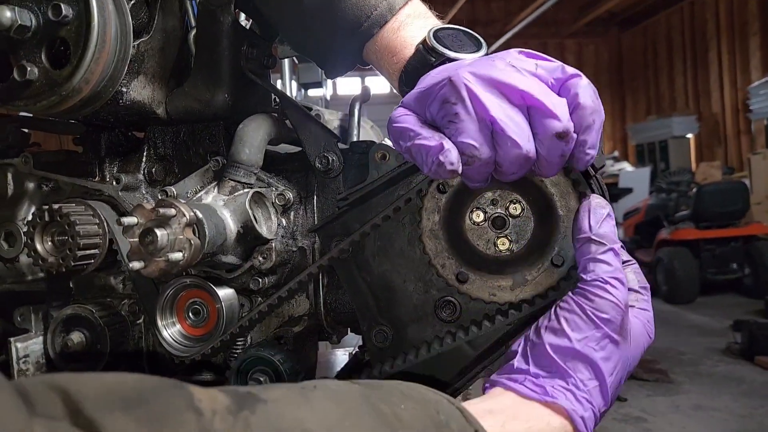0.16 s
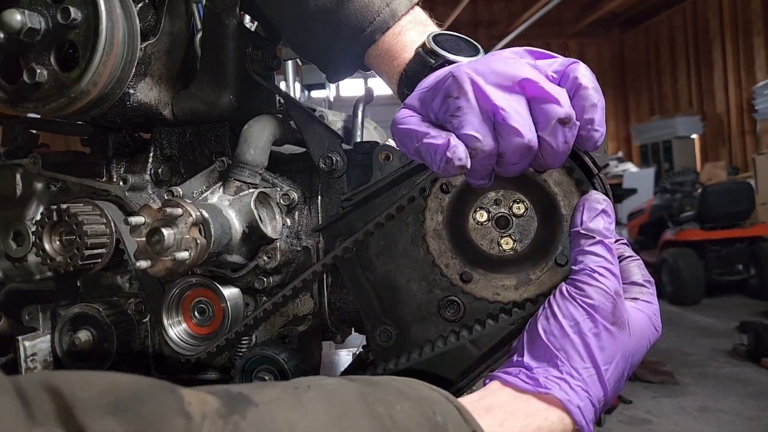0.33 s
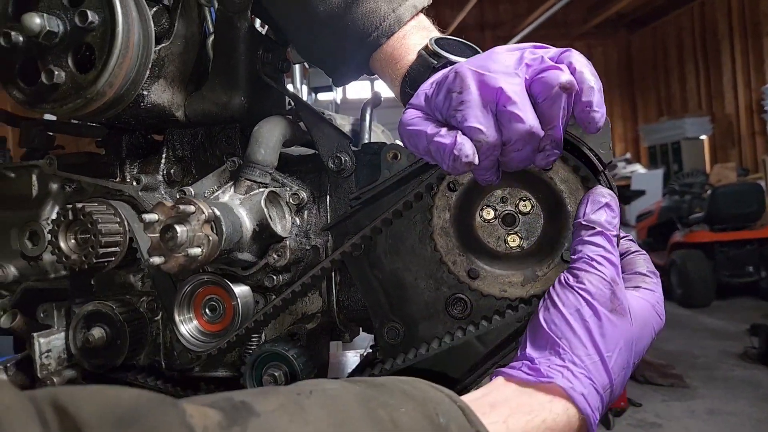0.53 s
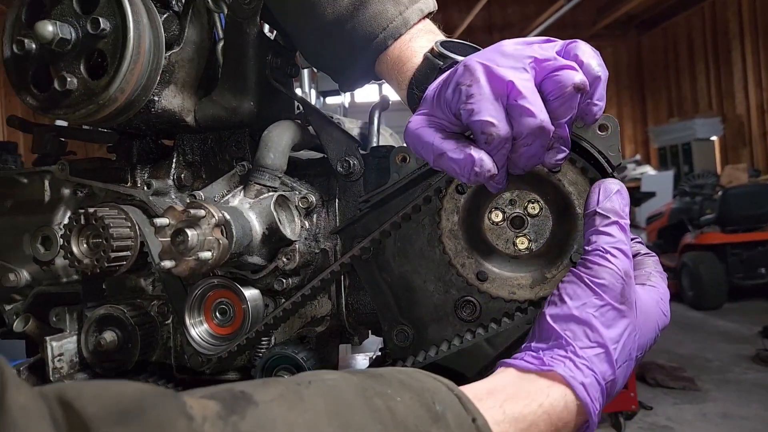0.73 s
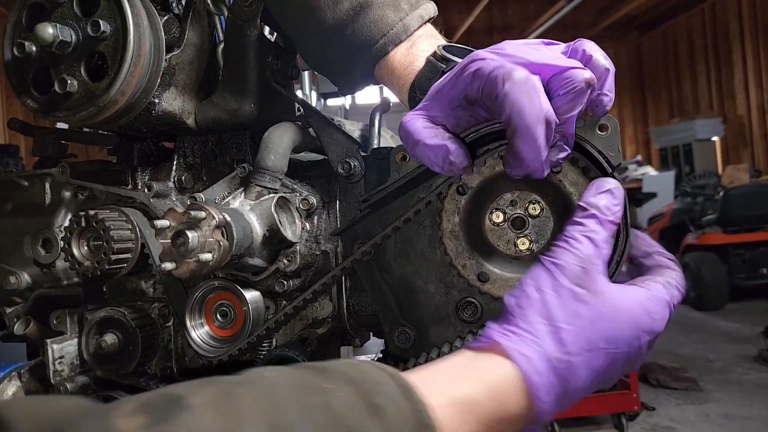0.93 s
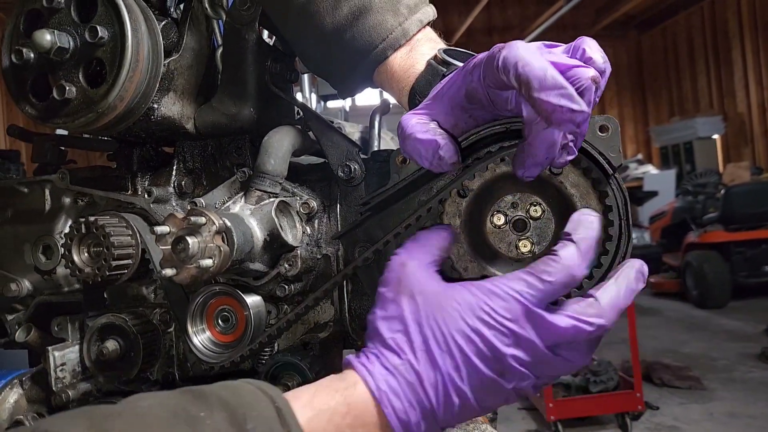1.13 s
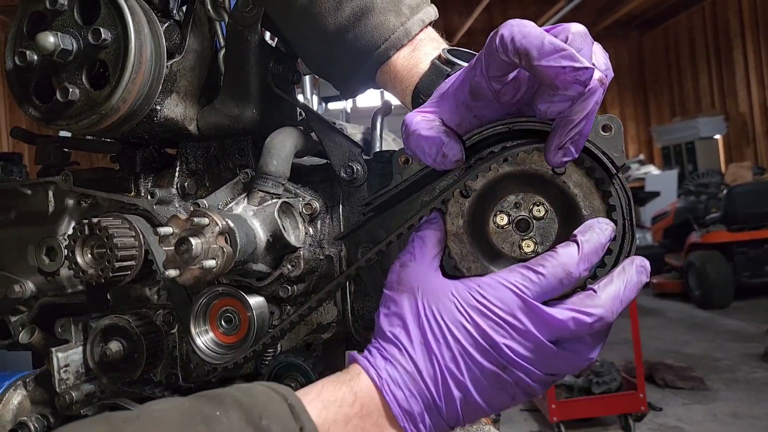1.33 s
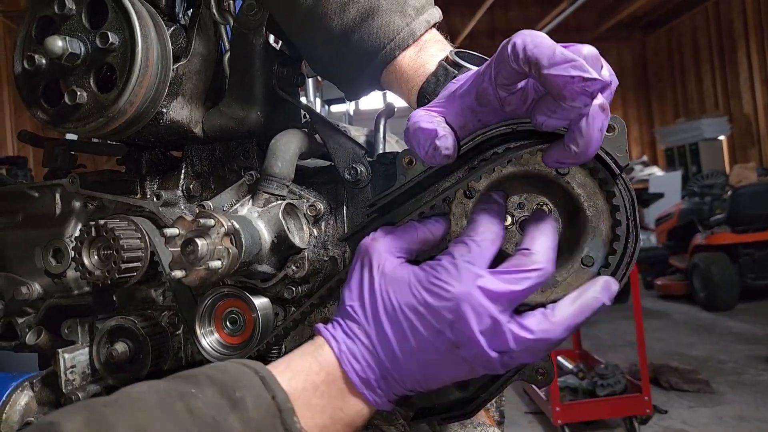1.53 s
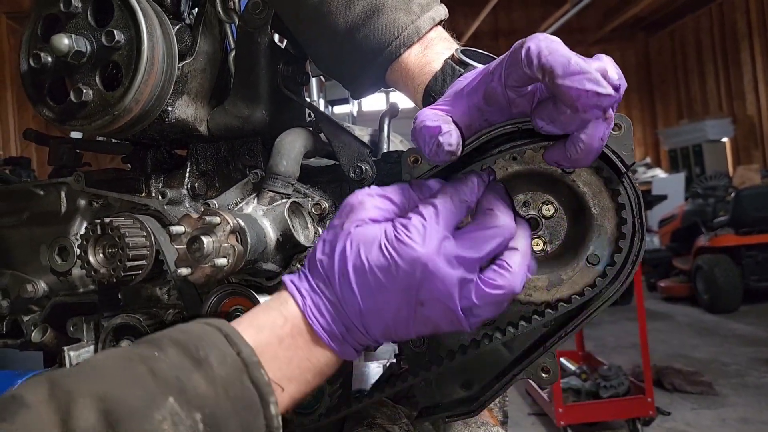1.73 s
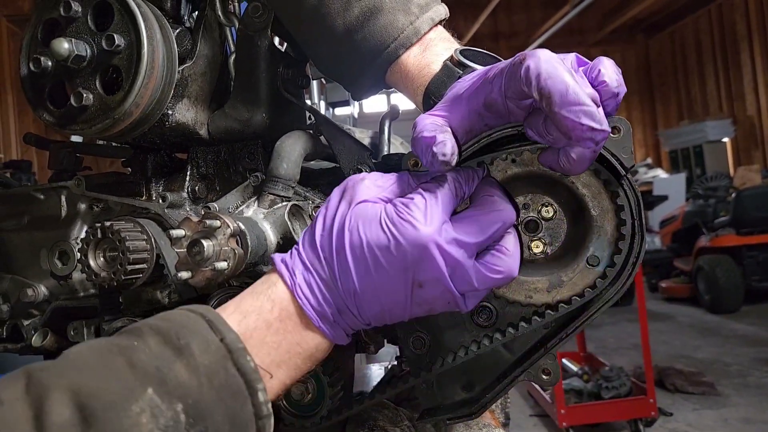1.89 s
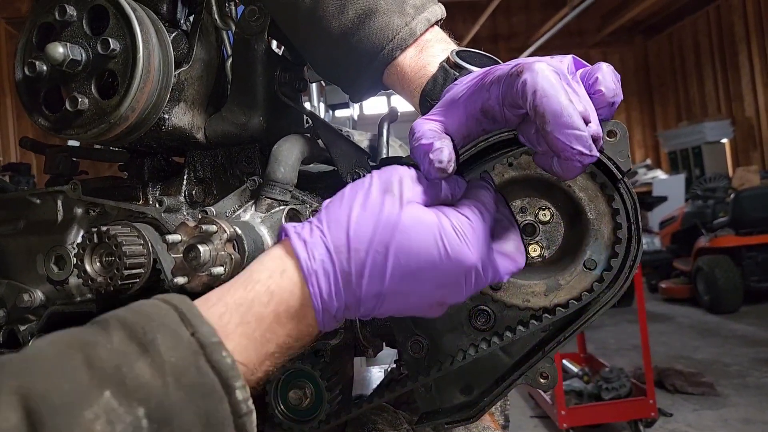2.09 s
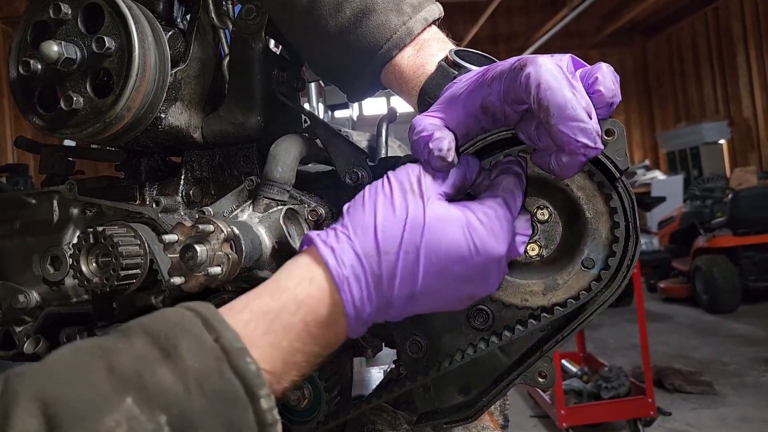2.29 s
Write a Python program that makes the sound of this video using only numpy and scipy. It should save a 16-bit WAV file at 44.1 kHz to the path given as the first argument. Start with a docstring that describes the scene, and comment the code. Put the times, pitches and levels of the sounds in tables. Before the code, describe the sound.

Short glove scuffs and a belt creak lead to a loud low thud, fluttering briefly; faint squeaks, sleeve rustle, soft finger bumps and small sharp clicks follow, heard close in a quiet garage.

```python
"""Gloves rub and crinkle in short strokes in a garage's still air, handling an engine's rubber timing belt.
The belt drags with a faint creak, slips onto its metal pulley with a deep knock and flutters on.
Clicks, thin squeaks, sleeve rustle, finger bumps and a low murmur follow. Friction is shaped noise,
knocks and bumps are decaying modes, flutter and squeaks are gliding sines; a noise tail adds the room."""
import sys
import numpy as np
from scipy import signal
from scipy.fft import rfft, irfft, next_fast_len
from scipy.io import wavfile
from scipy.ndimage import uniform_filter1d

SR = 44100
rng = np.random.default_rng(int(sys.argv[2]) if len(sys.argv) > 2 else 0)


def digitize_waveform(pressure):
    """Quantize a signal to 16-bit integers and store it at the path in sys.argv[1].

    Rows of a 2-D input are taken as channels; values are limited to [-1, 1].
    """
    field = np.atleast_2d(pressure).T
    bounded = np.clip(field, -1, 1)
    quanta = np.round(bounded * 32767).astype(np.int16)
    wavfile.write(sys.argv[1], SR, quanta)


N = 103635


def amp(db):
    """Decibels to gain."""
    return 10 ** (np.asarray(db) / 20)


def unit(x):
    """Scale to rms 1."""
    return x / np.sqrt(np.mean(x ** 2) + 1e-20)


def along(points, hz):
    """Interpolate (frequency [Hz], value) points on a log-frequency axis."""
    point_hz, value = np.transpose(points)
    return np.interp(np.log(hz + 1), np.log(point_hz + 1), value)


def clock():
    """Time of each sample [s]."""
    return np.arange(N) / SR


def filtered(x, response):
    """Multiply the spectrum of x by response(hz)."""
    m = next_fast_len(N + SR)
    return irfft(rfft(x, m) * response(np.fft.rfftfreq(m, 1 / SR)), m)[..., :N]


def colour(x, points):
    """Filter x by a (frequency [Hz], gain [dB]) curve."""
    return filtered(x, lambda hz: amp(along(points, hz)))


def narrow(x, hz, width_hz):
    """A steep band of x at rms 1: two cascaded peak filters, each 2 * width_hz wide."""
    peak = signal.iirpeak(hz, hz / (2 * width_hz), SR)
    return unit(signal.lfilter(*peak, signal.lfilter(*peak, x)))


def swell(s, rise_s, fall_s):
    """Bell-shaped stroke peaking at s; 1/e at rise_s before and fall_s after."""
    t = clock() - s
    return np.exp(-(t / np.where(t < 0, rise_s, fall_s)) ** 2)


def blow(s, rise_s, t60_s):
    """Quick exponential rise, then exponential decay."""
    t = np.maximum(clock() - s, 0)
    return (1 - np.exp(-t / rise_s)) * np.exp(-np.log(1000) * t / t60_s)


def spread(pair, alike):
    """Mix two unrelated signals to left and right with a correlation set per frequency."""
    def mid_side_gains(hz):
        turn = np.arccos(np.clip(along(alike, hz), -1, 1)) / 2
        return np.array([np.cos(turn), np.sin(turn)])

    mid, side = filtered(pair, mid_side_gains)
    return np.array([mid + side, mid - side])


def noise(points, alike):
    """Coloured stereo noise of rms 1."""
    return unit(colour(spread(rng.standard_normal((2, N)), alike), points))


# left-right likeness of room sound: (frequency [Hz], correlation)
ROOM_LIKENESS = [(60, 0.93), (250, 0.99), (600, 0.23), (1600, .25), (5000, 0.017)]
# air spectrum: (frequency [Hz], gain [dB])
AIR_COLOUR = [(20, -18), (60, 1.5), (130, -7), (270, -6), (450, -19), (800, -18.5), (4500, -13.5),
              (7000, -18), (15500, -24.5)]
AIR_DB = -65


def still_air():
    """Steady background noise of the garage air."""
    return amp(AIR_DB) * noise(AIR_COLOUR, ROOM_LIKENESS)


# left-right likeness of near sounds: (frequency [Hz], correlation)
NEAR_LIKENESS = [(60, 1), (250, 0.6), (600, 0.69), (1500, 0.048), (5000, 0.16), (15000, .1)]
SLIP_SCATTER_DB, SMOOTH_POWER_SHARE = 2, 0.4


def slips(rate_per_s):
    """Stick-slip friction: random jerks of uneven size mixed with smooth hiss."""
    size = amp(SLIP_SCATTER_DB * rng.standard_normal(N).clip(-2, 2))
    sign = rng.choice([-1, 1], (2, N))
    jerks = (rng.random(N) < rate_per_s / SR) * size * sign
    hiss = rng.standard_normal((2, N))
    mix = np.sqrt(1 - SMOOTH_POWER_SHARE) * unit(jerks) + np.sqrt(SMOOTH_POWER_SHARE) * hiss
    return spread(mix, NEAR_LIKENESS)


# glove contact spectrum: (frequency [Hz], gain [dB])
GLOVE_COLOUR = [(950, -13), (1300, 0.5), (2300, -10), (3200, 5), (3900, -1), (4700, 3.5), (5700, -10),
                (8000, -21), (15000, -37.5)]
# resonances of the rubbed pulley: (frequency [Hz], width [Hz], gain [dB])
PULLEY_MODES = [(1400, 120, -5), (1803, 190, 3), (2335, 210, 1.5), (3130, 16, 1), (3850, 250, -12),
                (4630, 120, 7.5)]
PULLEY_DB = -1  # relative to the glove colour
GLOVE_LOW_HZ = 1180  # the rubbed pulley radiates little below this


def pulley(x):
    """Contact sound: the glove's broad colour plus the pulley's resonances, low end cut, at rms 1."""
    def ring(f):
        total = 0
        for k, (hz, width_hz, db) in enumerate(PULLEY_MODES):
            resonance = 1j * f * width_hz / (hz * hz - f * f + 1j * f * width_hz)
            total = total + (-1) ** k * amp(db) * resonance
        return total

    both = unit(colour(x, GLOVE_COLOUR)) + amp(PULLEY_DB) * unit(filtered(x, ring))
    return unit(filtered(both, lambda hz: 1 / np.sqrt(1 + (GLOVE_LOW_HZ / (hz + 1)) ** 10)))


# glove strokes: (peak time [s], rise [s], fall [s], level [dB], fizz re level [dB], left minus right [dB])
GLOVE_STROKES = [(0.005, 0.034, 0.19, -61, -8.5, 6), (0.0892, 0.007, 0.0065, -43.5, -6, 4.5),
                 (0.110, 0.016, 0.0067, -50.5, -10.5, -7), (0.13, .008, 0.042, -59.5, -7, -0.5),
                 (0.205, 0.026, 0.048, -53, -4.5, 3), (0.328, 0.012, 0.018, -59, -1.5, 5),
                 (0.436, 0.031, 0.018, -59, -12.5, 1), (0.822, 0.016, 0.017, -55, -0.5, -1),
                 (0.891, 0.045, 0.034, -54, -1.5, 0.5), (1.112, 0.035, 0.037, -58, -4.5, 3),
                 (1.159, 0.016, 0.047, -65, 3.5, 0.5), (1.22, .013, 0.0076, -48, 0.5, 1.5),
                 (1.25, 0.02, 0.014, -51.5, -6.5, -2.5), (1.37, 0.028, 0.021, -59.5, -7.5, 7),
                 (1.431, 0.021, 0.027, -59, -10, 7), (1.464, 0.0074, 0.018, -52, -5.5, 2),
                 (1.548, .025, 0.019, -54, -2, -1), (1.583, 0.0097, 0.012, -53, -1.5, -3.5),
                 (1.66, 0.2, 0.02, -61, -5, 5.5), (1.804, 0.0072, 0.0084, -61, -2.5, 4),
                 (1.936, 0.014, 0.026, -55.5, -7.5, -3.5), (2.044, 0.0224, .02, -49, -8, -0.5),
                 (2.1149, 0.0036, 0.0059, -45, 3.5, 0.5), (2.135, 0.017, 0.0073, -61.5, -8.5, -11.5),
                 (2.207, 0.0096, 0.0098, -39.5, -7, 1)]
# crinkle spectrum: (frequency [Hz], gain [dB])
FIZZ_COLOUR = [(2000, -38), (5000, -4.5), (7500, -1), (10000, -7), (14000, 2), (15800, -5)]
GLOVE_SLIPS_PER_S = 900


def glove_rubs():
    """Stick-slip strokes of glove on belt and metal, each with its share of crinkly fizz."""
    friction = slips(GLOVE_SLIPS_PER_S)
    body, fizz = np.zeros((2, N)), np.zeros((2, N))
    for s, rise_s, fall_s, db, fizz_db, pan_db in GLOVE_STROKES:
        stroke = swell(s, rise_s, fall_s) * amp([[db + pan_db / 2], [db - pan_db / 2]])
        body += stroke
        fizz += amp(fizz_db) * stroke
    return body * pulley(friction) + fizz * unit(colour(friction, FIZZ_COLOUR))


# palms pressing and shifting on the belt: (time [s], level [dB], t60 [s])
PALM_PRESSES = [(0.001, -57, 0.47), (0.097, -58.5, 0.91), (0.585, -51.5, 1.0), (0.966, -49, .25),
                (1.187, -48.5, 0.44), (1.417, -56.5, 0.76), (1.53, -59, 0.66), (1.593, -56, 0.33),
                (2.038, -58.5, 0.68), (2.195, -64.5, 0.41)]
# press spectrum: (frequency [Hz], gain [dB])
PRESS_COLOUR = [(40, -33), (130, -12), (190, 2.5), (275, 2), (390, -6), (560, -8), (800, -13), (2000, -15),
                (5000, -40)]
CONTACT_RISE_S = 0.0009  # shared by presses, slaps and finger bumps


def palm_presses():
    """Each push on the belt gives a low, dull murmur: decaying dark noise."""
    level = sum(amp(db) * blow(s, CONTACT_RISE_S, t60_s) for s, db, t60_s in PALM_PRESSES)
    return level * noise(PRESS_COLOUR, NEAR_LIKENESS)


# glove scuffs and chafes: (peak time [s], half length [s], centre [Hz], nominal width [Hz], level [dB])
GLOVE_CHAFES = [(0.056, 0.0042, 1220, 150, -49), (0.0912, 0.0017, 3190, 700, -39),
                (0.127, 0.0088, 4150, 610, -48.5), (0.317, 0.012, 549, 260, -41),
                (0.329, 0.024, 2200, 594, -49.5), (1.164, 0.017, 4700, 500, -54.5),
                (1.215, 0.0038, 1337, 122.4, -46.5), (1.467, 0.0075, 3720, 700, -50.5),
                (1.581, 0.0079, 3270, 800, -50.5), (1.640, 0.0064, 3430, 401, -46),
                (2.04, 0.0038, 1340, 245.4, -51), (2.114, 0.0023, 4600, 202.4, -41),
                (2.1958, 0.0026, 3056, 395, -40.5), (2.2, 0.0049, 4620, 123, -41),
                (2.207, 0.0063, 3850, 150, -40.5)]


def glove_chafes():
    """Glove chafing on rubber: brief narrow bands of noise."""
    friction = spread(rng.standard_normal((2, N)), NEAR_LIKENESS)
    return sum(amp(db) * swell(s, half_s, half_s) * narrow(friction, hz, width_hz)
               for s, half_s, hz, width_hz, db in GLOVE_CHAFES)


# belt dragging on the rim: (peak time [s], rise [s], fall [s], level [dB])
BELT_DRAGS = [(0.091, 0.0089, 0.007, -49), (0.192, 0.016, 0.023, -50), (0.609, 0.13, 0.217, -57),
              (2.114, 0.0064, 0.0048, -50), (2.303, 0.027, 0.042, -57)]
# creak spectrum: (frequency [Hz], gain [dB])
DRAG_COLOUR = [(200, -6.5), (500, -19), (850, -15), (1050, -10.5), (1170, -3), (1400, -12.5), (1750, -23),
               (2300, -11.5), (3000, -22), (6000, -33)]
DRAG_SLIPS_PER_S = 2500
# thin rubber squeaks: (peak time [s], half length [s], top pitch before waver [Hz], level [dB])
RUBBER_SQUEAKS = [(0.587, 0.017, 12000, -75), (0.668, 0.036, 9380, -71.5), (0.703, .018, 12200, -72)]
SQUEAK_ARCH = 0.014  # share of pitch lost one half length from the peak
SQUEAK_WAVER = 0.005  # rms share of pitch


def belt_drag():
    """Rubber creaks along the rim by dense stick-slip and squeaks as thin wavering sines."""
    level = sum(amp(db) * swell(s, rise_s, fall_s) for s, rise_s, fall_s, db in BELT_DRAGS)
    sound = level * unit(colour(slips(DRAG_SLIPS_PER_S), DRAG_COLOUR))
    for s, half_s, hz, db in RUBBER_SQUEAKS:
        waver = SQUEAK_WAVER * unit(uniform_filter1d(rng.standard_normal(N), size=150))
        arch = SQUEAK_ARCH * np.clip((clock() - s) / half_s, -2, 2) ** 2
        phase = 2 * np.pi * np.cumsum(hz * (1 - arch + waver)) / SR
        sound = sound + amp(db) * swell(s, half_s, half_s) * np.sin(phase)
    return sound


# belt knocks: (time [s], level [dB], dullness: loss above the strongest mode [dB/octave])
BELT_KNOCKS = [(0.2101, -14.5, -3), (0.2163, -8, 3.5), (0.341, -30.5, 4)]
# modes of the belt span and its cover: (frequency [Hz], level [dB], t60 [s])
BELT_MODES = [(112.8, -28.5, 0.45), (191.6, 2.5, 0.11), (280.3, 1.5, 0.06), (334.6, -14.5, 0.082),
              (482.3, -18.5, 0.063), (540, -13.5, 0.05), (620, -20.5, 0.035), (715, -16, 0.031),
              (860, -26.5, 0.048)]
# slap spectrum: (frequency [Hz], gain [dB])
SLAP_COLOUR = [(30, -26), (90, -10.5), (200, -9), (500, 5.5), (900, -8.5), (1400, -18.5), (3000, -29),
               (8000, -74.5)]
BELT_RISE_S = 0.004
SLAP_DB, SLAP_T60_S = -15.5, 0.09  # toneless rubber slap; a knock's dullness also lowers it


def belt_knocks():
    """Each knock rings the damped belt modes, tilted by its dullness, under a toneless noise slap."""
    ring, slap = np.zeros(N), np.zeros(N)
    t = np.arange(SR // 2) / SR
    main_hz = max(BELT_MODES, key=lambda mode: mode[1])[0]
    for s, db, dull_db in BELT_KNOCKS:
        modes = np.zeros(len(t))
        for k, (hz, level_db, t60_s) in enumerate(BELT_MODES):
            octaves_above = max(np.log2(hz / main_hz), 0)
            envelope = (1 - np.exp(-t / BELT_RISE_S)) * np.exp(-np.log(1000) * t / t60_s)
            gain = (-1) ** k * amp(level_db - dull_db * octaves_above)
            modes += gain * envelope * np.sin(2 * np.pi * hz * t)
        ring += amp(db) * np.interp(clock() - s, t, modes, left=0, right=0)
        slap += amp(db - dull_db) * blow(s, CONTACT_RISE_S, SLAP_T60_S)
    return ring + amp(SLAP_DB) * slap * noise(SLAP_COLOUR, NEAR_LIKENESS)


# shudder spectrum: (frequency [Hz], gain [dB])
SHUDDER_COLOUR = [(20, -38.5), (55, -2), (85, 6.5), (115, -15), (170, -9.5), (290, 13), (500, -5),
                  (900, -41.5), (2000, -59.5)]
SHUDDER_DB, SHUDDER_T60_S, SHUDDER_RISE_S = -34.5, 0.96, 0.027


def engine_shudder():
    """The engine shudders low after the main knock: slowly rising, decaying dark noise."""
    main_knock_s = BELT_KNOCKS[1][0]
    envelope = blow(main_knock_s, SHUDDER_RISE_S, SHUDDER_T60_S)
    return amp(SHUDDER_DB) * envelope * noise(SHUDDER_COLOUR, ROOM_LIKENESS)


# belt span fluttering after the knock: (time [s], pitch [Hz], level [dB])
FLUTTER_TRACK = [(0.258, 205, -56.5), (0.277, 213, -27), (0.292, 199.4, -29.5), (0.308, 172.7, -61),
                 (0.33, 172, -34.5), (0.34, 213, -38.5), (0.354, 236, -39), (0.384, 176.8, -31),
                 (0.419, 168.3, -54), (0.441, 211, -40.5), (0.482, 168, -37.5), (0.514, 182.6, -64),
                 (0.54, 186, -38.5), (0.555, 190, -45)]
FLUTTER_FADE_S = 0.0056
FLUTTER_ROUGH = 0.17  # rms share of amplitude


def belt_flutter():
    """The span hums on under an unsteady grip: a sine gliding in pitch and level, roughened at random."""
    s, hz, db = np.transpose(FLUTTER_TRACK)
    t = clock()
    fade = np.clip(np.minimum(t - s[0], s[-1] - t) / FLUTTER_FADE_S, 0, 1)
    swing = uniform_filter1d(uniform_filter1d(rng.standard_normal(N), size=300), size=200)
    grip = 1 + FLUTTER_ROUGH * unit(swing)
    level = np.sqrt(2) * np.interp(t, s, amp(db))  # levels are rms
    phase = 2 * np.pi * np.cumsum(np.interp(t, s, hz)) / SR
    return fade * grip * level * np.sin(phase)


# small clicks: (time [s], level [dB], bright snap gain re ring [ratio])
SMALL_CLICKS = [(0.5472, -40.5, 0.22), (0.827, -48, 0.36), (1.173, -45, .1), (1.552, -37, 0.33),
                (2.064, -44, .1), (2.1061, -34.5, 0.13), (2.1307, -34, 0.12)]
CLICK_RISE_S, CLICK_T60_S = 0.0002, 0.005


def clicks():
    """Short noise ticks through the pulley's resonances, each with some bright snap."""
    grit = spread(rng.standard_normal((2, N)), NEAR_LIKENESS)
    ring, snap = pulley(grit), unit(colour(grit, FIZZ_COLOUR))
    return sum(amp(db) * blow(s, CLICK_RISE_S, CLICK_T60_S) * (ring + bright * snap)
               for s, db, bright in SMALL_CLICKS)


# sleeve sliding as the arm moves: (peak time [s], rise [s], fall [s], level [dB])
SLEEVE_SLIDES = [(0.80, 0.04, 0.214, -61), (1.42, 0.079, 0.089, -62)]
# cloth spectrum: (frequency [Hz], gain [dB])
SLEEVE_COLOUR = [(100, -36), (280, -1.5), (480, -14.5), (750, -8.5), (1500, -13.5), (5000, -29.5)]


def sleeve():
    """Sliding cloth rustles softly: swells of dull noise."""
    level = sum(amp(db) * swell(s, rise_s, fall_s) for s, rise_s, fall_s, db in SLEEVE_SLIDES)
    return level * noise(SLEEVE_COLOUR, NEAR_LIKENESS)


# fingers knocking on the belt and its cover: (time [s], level [dB])
FINGER_BUMPS = [(0.9637, -48), (1.189, -50), (1.2, -57), (1.219, -38), (1.2437, -43.5), (1.2959, -49.5),
                (2.0393, -48.5)]
# modes of the cover under the fingers: (frequency [Hz], level [dB], t60 [s])
COVER_MODES = [(250.3, -3, 0.12), (289, -3, 0.085), (362, -8.5, 0.097), (526, -2.5, 0.039),
               (1370, -5.5, 0.018)]


def finger_bumps():
    """Each finger knock rings the cover's damped modes briefly."""
    t = clock()
    bumps = np.zeros(N)
    for s, db in FINGER_BUMPS:
        for hz, level_db, t60_s in COVER_MODES:
            envelope = blow(s, CONTACT_RISE_S, t60_s)
            bumps += amp(db + level_db) * envelope * np.sin(2 * np.pi * hz * (t - s))
    return bumps


# low murmur: (peak time [s], rise [s], fall [s, sign has no effect], level [dB])
MURMUR_STROKE = (1.23, 0.06, -0.03, -51)
MURMUR_HZ, MURMUR_NOMINAL_WIDTH_HZ = 200, 68


def low_murmur():
    """A low murmur under the handling: one swell of narrow low noise."""
    s, rise_s, fall_s, db = MURMUR_STROKE
    band = narrow(rng.standard_normal(N), MURMUR_HZ, MURMUR_NOMINAL_WIDTH_HZ)
    return amp(db) * swell(s, rise_s, fall_s) * band


# garage decay: (frequency [Hz], t60 [s])
GARAGE_DECAY = [(100, 0.89), (250, 0.84), (1000, 0.95), (4000, 0.72), (14000, 0.41)]
# reverberation spectrum: (frequency [Hz], gain [dB])
WET_COLOUR = [(60, -16), (190, -33), (330, -20.5), (1000, -3.5), (4000, -15.5), (14000, -11)]


def garage(x):
    """Room answer: x convolved with a noise tail whose frequencies decay at their own rates."""
    hz, t, z = signal.stft(rng.standard_normal((2, N)), SR, nperseg=256)
    t60_s = along(GARAGE_DECAY, hz)[:, None]
    decay = np.exp(-np.log(1000) * t / t60_s)
    even_energy = np.sqrt(2 * np.log(1000) / (t60_s * SR))  # same tail energy for any t60
    tail = signal.istft(z * decay * even_energy, SR, nperseg=256)[1][:, :N]
    onset = 1 - np.exp(-(clock() / 0.003) ** 2)
    tail = colour(spread(tail, ROOM_LIKENESS), WET_COLOUR) * onset
    return signal.fftconvolve(x, tail, axes=1)[:, :N]


def scene():
    """All handling sounds, their room answer and the still air."""
    gloves = glove_rubs() + palm_presses() + glove_chafes()
    belt = belt_drag() + belt_knocks() + engine_shudder() + belt_flutter()
    near = gloves + belt + clicks() + sleeve() + finger_bumps() + low_murmur()
    return near + garage(near) + still_air()


# channel colour difference: (frequency [Hz], left minus right [dB])
STEREO_LEAN = [(60, 0), (170, 2.5), (350, 4.5), (900, 2), (1800, 2.5), (2800, 0), (4200, -9), (6400, 0),
               (9800, 6), (15000, -1)]
TOP_HZ = 15900


def record(dry):
    """The two microphones differ in colour; nothing from TOP_HZ up is kept."""
    half = np.array([[0.5], [-0.5]])
    return filtered(dry, lambda hz: amp(half * along(STEREO_LEAN, hz)) * (hz < TOP_HZ))


dry = scene()
out = record(dry)
digitize_waveform(out)
```